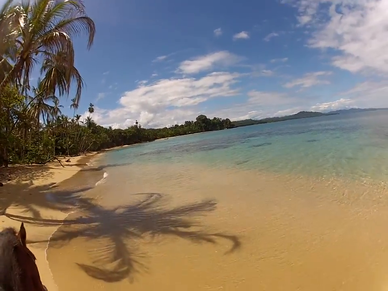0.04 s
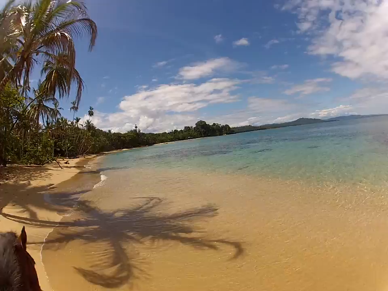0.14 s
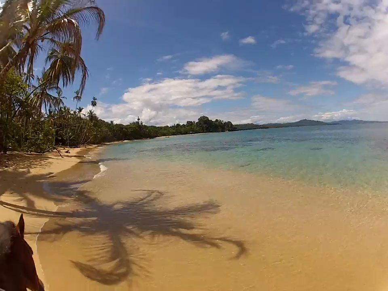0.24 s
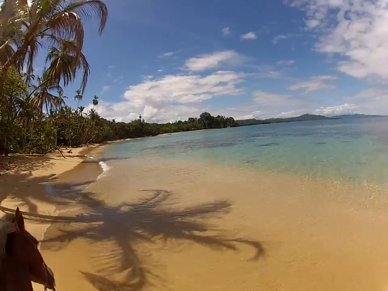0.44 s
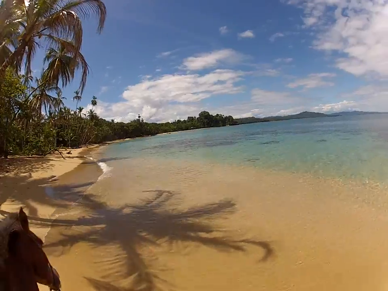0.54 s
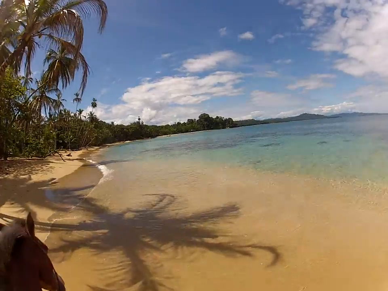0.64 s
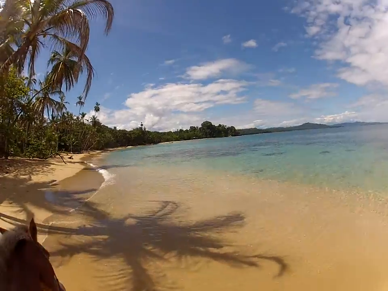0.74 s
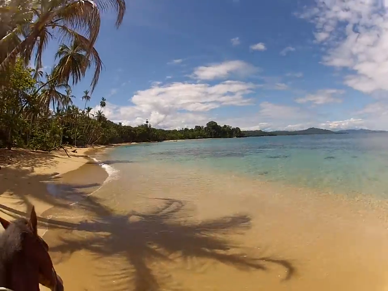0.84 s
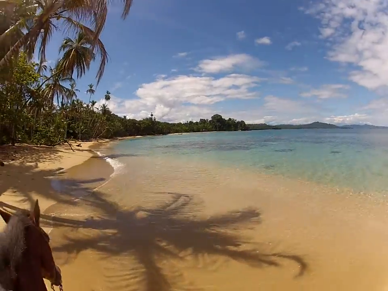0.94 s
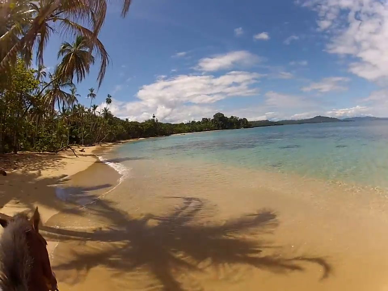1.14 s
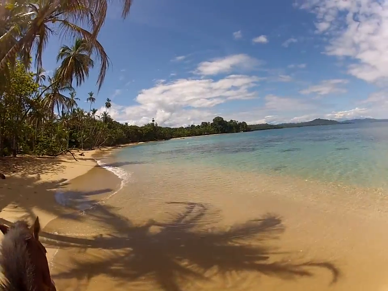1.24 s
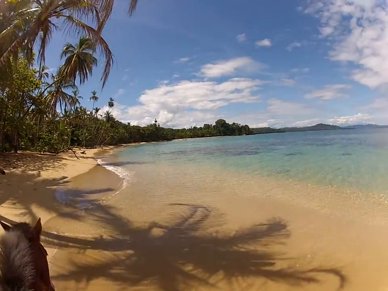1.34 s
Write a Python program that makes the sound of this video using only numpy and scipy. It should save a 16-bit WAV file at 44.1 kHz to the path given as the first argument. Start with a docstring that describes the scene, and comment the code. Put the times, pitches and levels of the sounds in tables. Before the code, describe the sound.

A horse's hoof thuds hard into wet sand, then another splashes in shallow water. A small wave swells and gurgles as two lighter steps land. Heard from the saddle on a beach, over steady surf and breeze.

```python
"""A horse walks along the water's edge on a sandy beach, heard from the saddle, over a steady
hiss of surf and breeze. After a faint step and two ticks of drops, a hoof thuds hard into wet
sand and throws grit. The next slaps shallow water, and trapped air rings in the splash.
A small wave swells, gurgles and draws back, while two lighter steps land and more drops tick."""
import sys
import numpy as np
from scipy import signal
from scipy.fft import rfft, irfft
from scipy.io import wavfile
from scipy.ndimage import uniform_filter1d

SR = 44100
rng = np.random.default_rng(int(sys.argv[2]) if len(sys.argv) > 2 else 0)


def to_wav(s):
    """Save 16-bit WAV."""
    ch = np.atleast_2d(s).T  # columns
    pcm = np.round(np.clip(ch, -1, 1) * 32767)  # PCM
    wavfile.write(sys.argv[1], SR, pcm.astype(np.int16))


N = 61739
T = np.arange(N) / SR
FREQS_HZ = np.maximum(np.arange(N // 2 + 1) * SR / N, 1)


# Hoof impacts: time_s, pitch_hz, half_length_s, thud_peak_db, knock_peak_db
HOOF_THUDS = [(.002, 179, 0.003, -36, -61), (0.2498, 276.5, 0.0014, -11, -18.5),
              (0.8403, 280, 0.0012, -26, -42), (1.194, 215, 0.0056, -31, -55)]

def hoof_thuds():
    """A short knock on contact, then a dull thud whose pitch sinks as the hoof does."""
    knock_lead_s, out = 0.0008, 0
    for time_s, pitch_hz, half_length_s, thud_db, knock_db in HOOF_THUDS:
        knock = pulse(time_s - knock_lead_s, pitch_hz=660, half_length_s=0.00056, peak_db=knock_db)
        thud = pulse(time_s, pitch_hz, half_length_s, thud_db, glide_per_s=-34.5)
        out += knock + thud
    return out


# Sand bursts: start_s, decay_s, level_db
SAND_BURSTS = [(0.248, 0.0024, -24.5), (0.2529, 0.0058, -30), (.2680, 0.0053, -33.5)]
# Sand spectrum: freq_hz, gain_db
SAND_SPECTRUM = [(60, -19), (350, 1.5), (700, 4), (1050, 3), (1450, -3.5), (2000, -3.5), (3800, -8.5),
                 (6000, -16), (8000, -14.5), (12000, -14.5), (15500, -24)]

def thrown_sand():
    """A hoof throws wet grit in quick bursts."""
    envelope = sum(undb(level_db) * burst(start_s, attack_s=0.0006, hold_s=0.0006, decay_s=decay_s)
                   for start_s, decay_s, level_db in SAND_BURSTS)
    return spray(SAND_SPECTRUM) * envelope


# Splash bursts: start_s, hold_s, level_db
SPLASH_BURSTS = [(0.527, 0.0096, -31.5), (0.539, 0.0043, -38), (.548, 0.0049, -44), (0.561, 0.02, -47)]
# Splash spectrum: freq_hz, gain_db
SPLASH_SPECTRUM = [(150, -11), (700, -5.5), (1200, -1.5), (2000, 3), (4500, -4), (8000, -11.5),
                   (10500, -3.5), (12000, -46), (14000, -2), (15500, -26)]
# Trapped air: time_s, pitch_hz, half_length_s, peak_db
AIR_POCKETS = [(0.528, 1470, 0.0015, -30.5), (0.532, 1726, 0.00058, -16), (0.545, 2190, 0.00056, -29),
               (.5455, 5020, 0.00079, -31), (.5456, 7040, 0.0013, -35), (0.574, 2010, 0.0012, -37.5)]

def splash():
    """Slapped water sprays; trapped air rings with rising pitch."""
    envelope = sum(undb(level_db) * burst(start_s, attack_s=0.0015, hold_s=hold_s, decay_s=0.0035)
                   for start_s, hold_s, level_db in SPLASH_BURSTS)
    pockets = sum(pulse(*pocket, glide_per_s=25) for pocket in AIR_POCKETS)
    return spray(SPLASH_SPECTRUM) * envelope + pockets


# Drop and grit impacts: start_s, hold_s, pitch_hz, level_db
DROP_TICKS = [(.138, 0.0027, 5650, -45), (0.181, 0.0047, 6000, -50.5), (1.123, .006, 5060, -52.5),
              (1.1542, 0.0014, 3900, -36)]
# Tick spectrum: freq_hz, gain_db
TICK_SPECTRUM = [(500, -5), (2200, 0), (3900, 3.5), (5200, -10.5), (8000, 3), (10000, -15), (15500, -13)]

def drop_ticks():
    """Drops and grit tick, each a brief crackle with one broad ring."""
    ring_db, ring_width_oct, out = 5.5, 0.15, 0
    for start_s, hold_s, pitch_hz, level_db in DROP_TICKS:
        boost_db = ring_db * np.exp(-(np.log2(FREQS_HZ / pitch_hz) / ring_width_oct) ** 2)
        crackle = unit_rms(irfft(rfft(spray(TICK_SPECTRUM)) * undb(boost_db), N))
        out += crackle * undb(level_db) * burst(start_s, attack_s=0.00087, hold_s=hold_s, decay_s=0.0008)
    return out


# Gurgles in the wave: time_s, pitch_hz, half_length_s, peak_db
WAVE_GURGLES = [(0.762, 580, 0.0042, -42), (0.951, 606, 0.0084, -37), (1.091, 437, 0.0037, -39.5),
                (1.39, 277, 0.0077, -46.5)]

def gurgles():
    """Hollow blips in the wave, each rising slightly in pitch."""
    return sum(pulse(*gurgle, glide_per_s=2.8) for gurgle in WAVE_GURGLES)


# Wave spectrum: freq_hz, gain_db
WAVE_SPECTRUM = [(30, -6), (90, -9), (190, 5), (420, -0.5), (600, 2.5), (780, -7), (1020, -4.5),
                 (1500, -29), (2600, -16), (5000, -27), (8000, -28), (15300, -33.5)]
# Wave swell: time_s, level_db
WAVE_LEVEL = [(0, -56.5), (.5, -57.5), (.61, -51), (.77, -43.5), (.82, -47.5), (.92, -44.5), (1.01, -45.5),
              (1.08, -55.5), (1.3, -54.5), (1.4, -50)]
# Wave brightness: time_s, tilt_db_per_oct
WAVE_BRIGHTNESS = [(0, 1.5), (.66, -1.9), (.8, -0.81), (.98, 2.6), (1.15, 4.2), (1.4, -3.6)]

def small_wave():
    """One small wave swells and brightens as it runs up the sand."""
    wash = colour(rng.standard_normal(N), WAVE_SPECTRUM)
    return churn(wash, curve(WAVE_BRIGHTNESS)) * undb(curve(WAVE_LEVEL))


# Surf and breeze spectrum: freq_hz, gain_db
SURF_SPECTRUM = [(20, 2.5), (70, -2.5), (170, 0.5), (580, 0), (760, -4.5), (1020, -1.5), (1500, -6.5),
                 (2600, -9.5), (3100, -13), (4200, -15), (5400, -17), (8000, -20), (10500, -22.5),
                 (15300, -25)]
# Surf and breeze loudness: time_s, level_db
SURF_LEVEL = [(0, -49), (.3, -49.5), (.55, -45.5), (.8, -46), (1.1, -48.5), (1.3, -50.5), (1.4, -52)]

def surf():
    """Surf and breeze hiss throughout, with a gentle swell."""
    hiss = colour(rng.standard_normal(N), SURF_SPECTRUM)
    return churn(hiss) * undb(curve(SURF_LEVEL))


def churn(wash, tilt_db_per_oct=0, pivot_hz=390, flicker_db=1.54):
    """Each octave of a wash flickers on its own; the tilt leans the octaves near the pivot."""
    centres_oct = np.arange(4, 15)  # log2 of Hz
    spectrum, out = rfft(wash), 0
    for centre_oct, weights in zip(centres_oct, np.eye(len(centres_oct))):
        band = irfft(spectrum * np.interp(np.log2(FREQS_HZ), centres_oct, weights), N)
        offset_oct = np.clip(centre_oct - np.log2(pivot_hz), -2, 1)
        out += band * undb(flicker_db * wander(rate_hz=25) + tilt_db_per_oct * offset_oct)
    return out


def spray(spectrum, hits_per_s=4600, spread_db=2, mist_gain=0.66):
    """Dense tiny impacts of uneven size in a fine mist."""
    hits = (rng.random(N) < hits_per_s / SR) * np.sign(rng.standard_normal(N))
    sizes = undb(spread_db * np.minimum(rng.exponential(size=N), 4))
    mist = mist_gain * rng.standard_normal(N)
    return colour(unit_rms(hits * sizes) + mist, spectrum)


def pulse(time_s, pitch_hz, half_length_s, peak_db, glide_per_s=0):
    """A few gliding cycles under a Gaussian envelope centred on time_s."""
    t = np.clip(T - time_s, -10 * half_length_s, 10 * half_length_s)
    envelope = undb(peak_db) * np.exp(-(t / half_length_s) ** 2 / 2)
    return -envelope * np.cos(2 * np.pi * pitch_hz * t * (1 + glide_per_s * t / 2))


def burst(start_s, attack_s, hold_s, decay_s):
    """Linear attack; exponential decay from hold_s after the start."""
    t = T - start_s
    return np.clip(t / attack_s, 0, 1) * np.exp(-np.maximum(t - hold_s, 0) / decay_s)


def colour(x, spectrum):
    """Shape by (freq_hz, gain_db) rows; rms 1."""
    freq_hz, gain_db = np.array(spectrum).T
    gain = undb(np.interp(np.log(FREQS_HZ), np.log(freq_hz), gain_db))
    return unit_rms(irfft(rfft(x) * gain, N))


def dip(x, centre_hz, width_hz, depth):
    """Hollow out one narrow band."""
    gain = 1 - depth * np.exp(-((FREQS_HZ - centre_hz) / width_hz) ** 2)
    return irfft(rfft(x) * gain, N)


def wander(rate_hz):
    """Smooth random drift; rms 1."""
    step = int(SR / rate_hz)
    stairs = np.repeat(rng.standard_normal(N)[:N // step + 1], step)
    return unit_rms(uniform_filter1d(stairs, step)[:N])


def curve(rows):
    """Join (time_s, value) rows by straight lines."""
    return np.interp(T, *np.array(rows).T)


def undb(db):
    """Decibels to gain."""
    return 10 ** (np.asarray(db) / 20)


def unit_rms(x):
    """Scale to rms 1."""
    return x / np.sqrt(np.mean(x ** 2))


# The recorder notches the background hiss near 6 kHz: centre_hz, width_hz, depth
RECORDER_HISS_NOTCH = (5990, 590, 0.87)

def scene():
    """Hooves and water close by, the sea behind."""
    horse = hoof_thuds() + thrown_sand() + splash() + drop_ticks()
    background = dip(surf() + small_wave(), *RECORDER_HISS_NOTCH) + gurgles()
    return (horse + background)[None]


# Treble notch: centre_hz, width_hz, depth
TREBLE_NOTCH = (12000, 210, .96)

def record(dry):
    """The camera notches the treble, thins the deep bass and cuts the top."""
    low_cut_hz, top_hz = 55, 15300
    highpass = signal.butter(1, low_cut_hz, "high", fs=SR, output="sos")
    lowpass = signal.ellip(10, .2, 70, top_hz, fs=SR, output="sos")
    thinned = signal.sosfilt(highpass, dip(dry, *TREBLE_NOTCH))
    return signal.sosfilt(lowpass, thinned)


dry = scene()
out = record(dry)
to_wav(out)
```